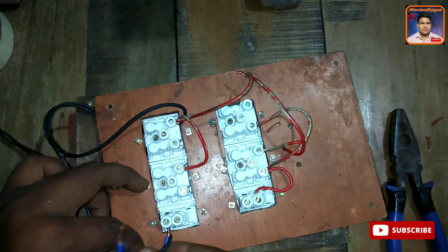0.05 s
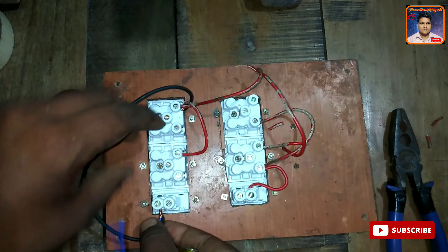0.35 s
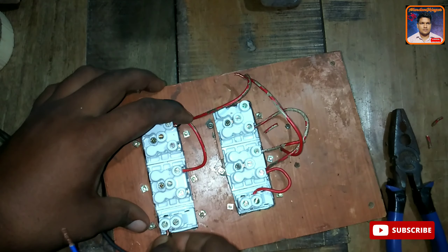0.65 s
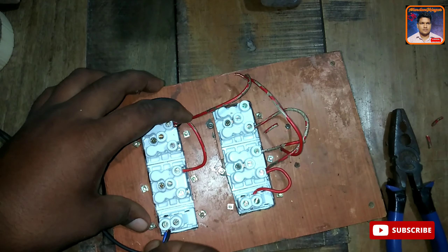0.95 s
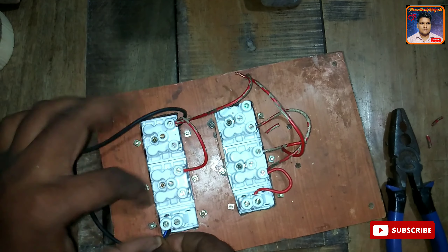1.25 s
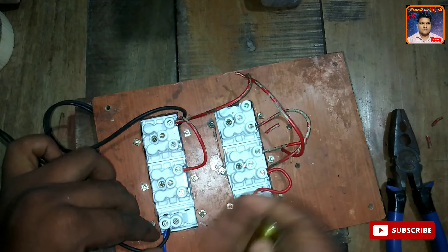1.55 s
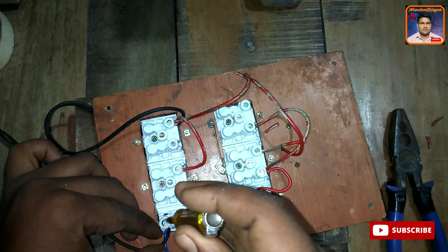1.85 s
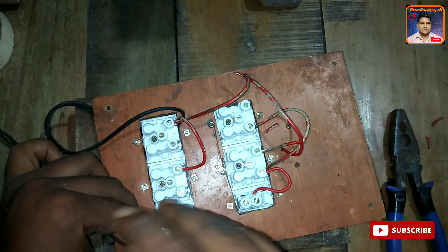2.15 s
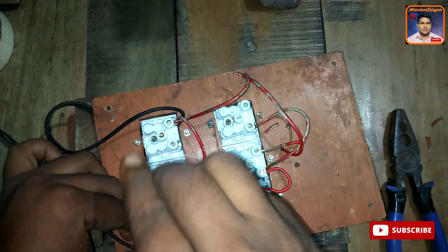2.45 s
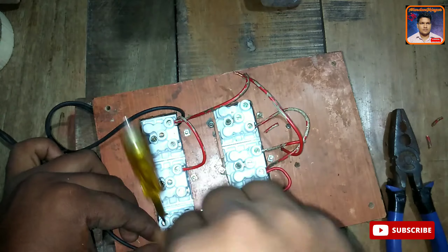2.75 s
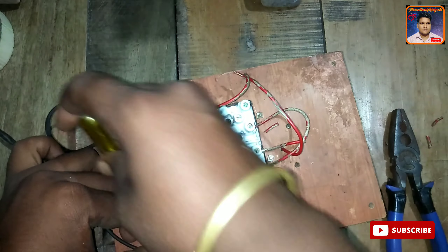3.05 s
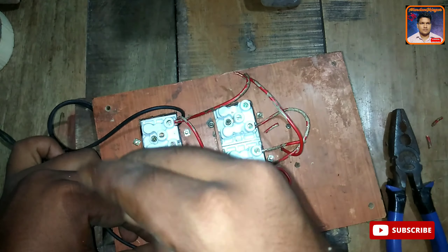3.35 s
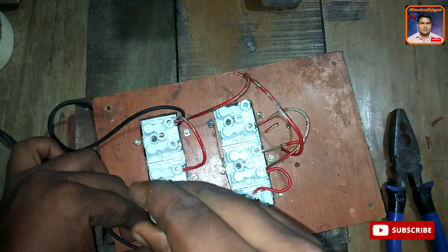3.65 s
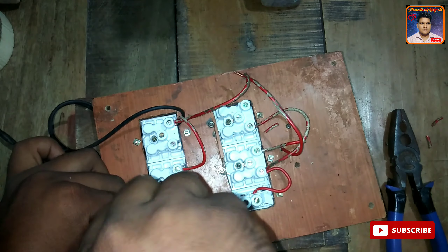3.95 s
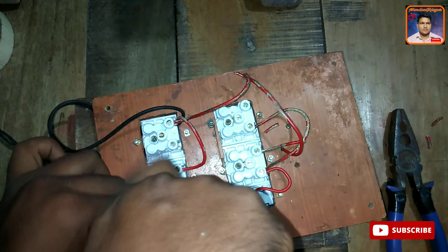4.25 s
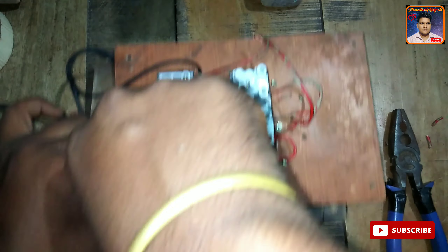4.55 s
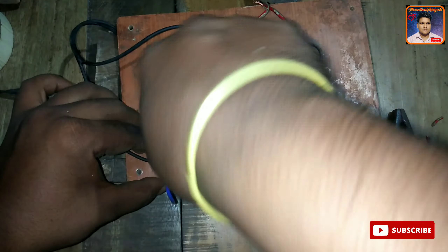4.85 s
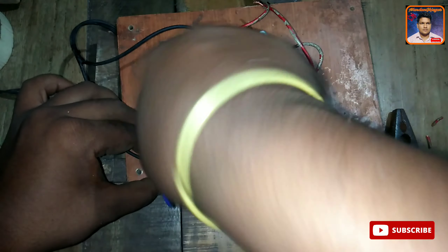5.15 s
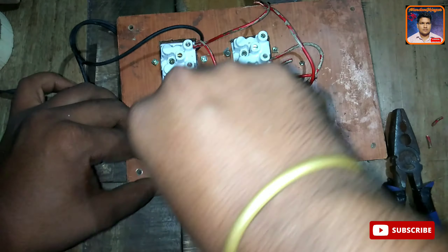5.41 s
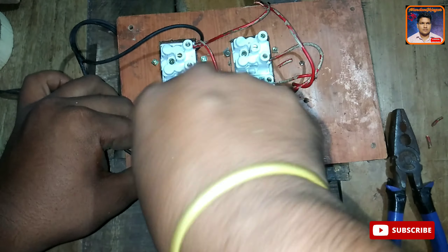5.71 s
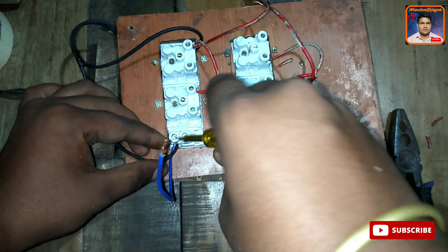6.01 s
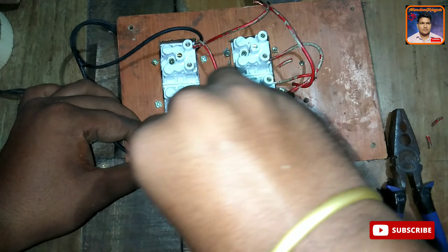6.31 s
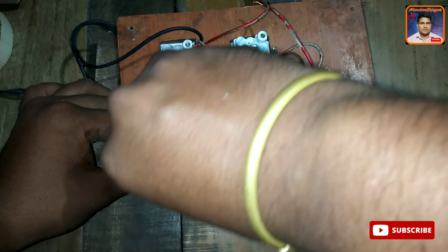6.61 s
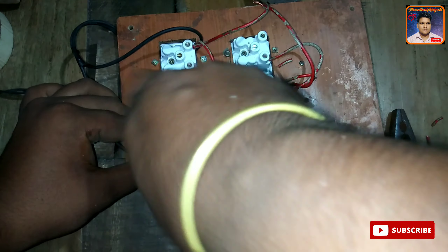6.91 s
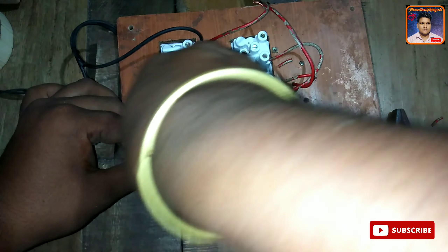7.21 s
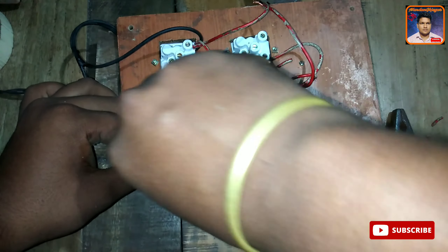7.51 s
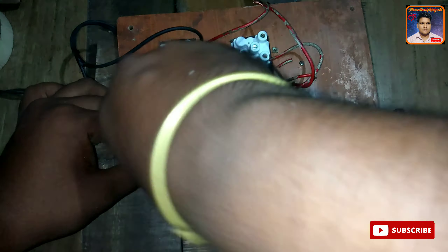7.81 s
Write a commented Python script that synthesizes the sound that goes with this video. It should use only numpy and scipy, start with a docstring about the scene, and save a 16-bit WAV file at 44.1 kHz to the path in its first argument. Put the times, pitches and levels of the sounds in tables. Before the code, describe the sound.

A loose board knocks and scrapes hollowly on a wooden table as a hand grabs it. Small, sharp clicks follow as a wire and a screwdriver tap the terminal of a plastic switch. Midway the board is shoved again with a short rumbling scrape, then the blade ticks and briefly grinds in a screw slot. Fingers rub and the wire rustles faintly throughout, heard close up in a small, quiet room.

```python
"""A wire is fitted to plastic switches on a loose board that lies on a wooden table in a small room.
First a hand grabs and shoves the board: impacts excite its resonances and stick-slip friction rumbles.
Then wire and screwdriver tap a terminal, and near 4.5 s the board is shoved again. From 5 s the blade
turns the screw, jumping and grinding in the slot; near 6.8 s the handle slips through the fingers.
Fingers rub and the wire rustles all along, and reverberation gives every contact a short tail."""
import sys
import numpy as np
from scipy import signal
from scipy.fft import rfft, irfft, next_fast_len
from scipy.io import wavfile
from scipy.ndimage import map_coordinates

SR = 44100
rng = np.random.default_rng(int(sys.argv[2]) if len(sys.argv) > 2 else 0)


def bounce(signal):
    """Save signal as a 16-bit WAV file at the path given by the first command-line argument."""
    frames = np.transpose(np.atleast_2d(signal))
    limited = np.clip(frames, -1, 1)
    pcm = np.round(limited * 32767).astype(np.int16)
    wavfile.write(sys.argv[1], SR, pcm)


N = 347067
TIME = np.arange(N) / SR
EDGE_HZ = 8870  # usual pitch of a contact's bright edge

# resonances of board and table: pitch_hz, width_hz, level_db
BOARD_MODES = [(167.4, 6.8, -5.5), (209.4, 6.2, -4), (251.2, 10, -1.5), (344, 30, -3.5), (407.4, 15, 7.5),
               (522, 20, -11), (560, 33, -4), (597.4, 30, -1.5), (753, 38, -7), (814, 43, -8.5),
               (944, 19, -6.5), (1065, 28, -3), (1144, 27, -6.5), (1730, 61, -10.5), (1960, 22, -12.5),
               (2052, 36, -8.5), (2856, 48, -4)]
# the board rocks on the table: start_s, level_db, weight_db, hardness_db
BOARD_KNOCKS = [(.0576, -57.5, 1.5, -7.5), (0.1816, -43, 8, -12), (.186, -42.5, 12, -5.5),
                (0.2115, -37.5, 9, -10.5), (0.249, -45, 15, -5), (0.2639, -34.5, -9, -14),
                (0.3405, -51.5, -21, -5.5), (.4246, -42, 5.5, -24.5), (.4629, -47, 8, -10),
                (0.5128, -39.5, 6.5, -9.5), (0.534, -19.5, 0, -20.5), (.546, -32.5, 6.5, -12.5),
                (.6202, -28.5, 5.5, -22), (0.6393, -32, -2, -10), (0.6798, -42.5, -1, 0.5),
                (0.7141, -41, -0.5, 0), (1.08, -60, -1.5, -8), (1.2567, -63, 6.5, -2),
                (2.7705, -47.5, -1, -9), (2.7999, -44.5, -1.5, -8), (2.8246, -42.5, -1, -10.5),
                (2.918, -42, -1.5, -10.5), (3.17, -60, 4.5, -21), (4.468, -50.5, 6.5, -20.5),
                (4.766, -51.5, 4, -16), (5.151, -55, -1.5, -15), (5.607, -45.5, 1, -28),
                (6.4563, -60.5, 4.5, -19), (6.7216, -52.5, 2.5, -16), (7.119, -50, -1, -14),
                (7.1683, -55.5, 0.5, -10), (7.6389, -54.5, -11, -17), (7.663, -55.5, -10, -17),
                (7.7756, -50, 0.5, -9), (7.8085, -47, -7, -11)]


def board_knocks():
    """Impact excitation: the board clacks at about the same pitch wherever it lands."""
    knocks = [(*row, scattered(964), scattered(EDGE_HZ)) for row in BOARD_KNOCKS]
    return contacts(knocks, BOARD_MODES, between_db=-15.5, room_db=3.5, clean_db=-2,
                    spot_db=3.5, ring_spot_db=1.5, ring_db=-3, detune=0, smear=0.69)


# thud, clack, ring and edge of a contact: low_hz, high_hz, snap_t60_s, tail_db, tail_t60_s
CONTACT_BANDS = [(154.6, 640, 0.027, -6.5, 0.17), (735, 2110, 0.02, -9.5, 0.15),
                 (2880, 5800, 0.015, -10.5, 0.15), (6570, 14700, 0.015, -10.5, 0.14)]


def contacts(blows, modes, between_db, room_db, clean_db, spot_db, ring_spot_db, ring_db, detune, smear):
    """Source and filter: a clean impulse, a rough snap and a diffuse tail pass through the struck body."""
    size = 12288
    t, hz = np.arange(size) / SR, np.fft.rfftfreq(size, 1 / SR)
    out = np.zeros(N + size)
    passbands = [causal(band(hz, low, high, order=6)) for low, high, *_ in CONTACT_BANDS]
    for start, level_db, weight_db, hardness_db, clack_hz, edge_hz in blows:
        # weight behind the blow feeds the thud; a hard contact feeds the ring and the edge
        levels = level_db + np.array([weight_db, 0, ring_db + 0.64 * hardness_db, hardness_db])
        # the grip shifts the resonances a little, and the struck spot favours three groups of them
        grip = 1 + detune * rng.standard_normal()
        spot = amp(spot_db * (near(hz, clack_hz, 0.18) + near(hz, edge_hz, 0.13))
                   + ring_spot_db * near(hz, 0.36 * edge_hz, 0.18))
        colour = causal(body(modes, hz * grip, between_db) * spot)
        # light contacts rub as much as they strike, so their snap lasts longer
        lightness = np.clip((-42 - max(levels)) / 12, 0, 1)
        for (_, _, snap_t60, tail_db, tail_t60), passband, db in zip(CONTACT_BANDS, passbands, levels):
            snap = amp(-60 * t / (snap_t60 * (1 + smear * lightness)))
            tail = amp(tail_db + room_db - 60 * t / tail_t60)
            force = rng.standard_normal(size) * np.hypot(snap, tail)
            force[0] += amp(clean_db) * (1 - lightness) * np.linalg.norm(snap)
            response = irfft(rfft(force) * colour * passband)
            onset_rms = response[:round(.015 * SR)].std()
            out[round(start * SR):][:size] += response * amp(db) / onset_rms
    return out[:N]


# spectrum of the board's sliding friction: frequency_hz, level_db
DRAG_SPECTRUM = [(59, -60), (100, -34.5), (202, 4), (406, -6.5), (471, -9), (583, -1), (691, -18.5),
                 (736, -6.5), (1360, -16), (1760, -6.5), (2470, -18), (2930, -14.5), (3470, -18.5),
                 (10200, -27), (16000, -42)]
# the board drags over the table: start_s, length_s, rumble_db, scrape_db
BOARD_SHOVES = [(0.182, 0.085, -36.5, -44), (2.298, 0.11, -67, -64), (2.701, 0.12, -57, -54.5),
                (4.461, 0.18, -34, -32.5)]


def board_shoves():
    """Stick-slip friction: the board catches and lets go; its weight rumbles, its edge scrapes."""
    slips = friction(slips_per_s=1100, smooth_db=1, uneven_db=.9)
    grind = filtered(slips, lambda hz: shape(DRAG_SPECTRUM, hz) * body(BOARD_MODES, hz, between_db=-8))
    rumble = unit(filtered(grind, lambda hz: band(hz, 1, 560)))
    scrape = unit(filtered(grind, lambda hz: band(hz, 760, SR)))
    out = np.zeros(N)
    for start, length, rumble_db, scrape_db in BOARD_SHOVES:
        # the board breaks loose, gathers speed and stops
        push = stroke(start, length, attack_s=.008, slope_db_per_s=71, release_db_per_s=184)
        out += push * (amp(rumble_db) * rumble + amp(scrape_db) * scrape)
    return out


# resonances of the switch and the free screwdriver: pitch_hz, width_hz, level_db
TERMINAL_MODES = [(342, 58, -1.5), (404.3, 18, 7), (1020, 160, -3), (1697, 130, -4.5), (1960, 100, -6),
                  (2920, 200, -2.5), (3200, 110, 1), (3930, 210, 1.5), (4813, 170, 3.5), (7740, 220, -7),
                  (9400, 430, -13.5), (13700, 340, -14)]
# taps on the terminal: start_s, level_db, weight_db, hardness_db, clack_hz, edge_hz
TERMINAL_TAPS = [(.6095, -55, 2, 15, 876, 6900), (.704, -56.5, 20.5, 11, 830, 8400),
                 (.7944, -38.5, -2, -3.5, 843, 7930), (.8217, -37.5, -5.5, -1.5, 1970, 8400),
                 (.9135, -66, 0.5, 9, 1270, 7900), (.945, -55.5, -9, -7, 1850, 9000),
                 (1.1758, -51.5, -2, -4.5, 2060, 8700), (1.1846, -49, -2, -1, 2080, 7040),
                 (1.8284, -45.5, -5.5, -1, 1170, 7120), (1.8757, -57, 2.5, 5.5, 1186, 11100),
                 (2.0037, -55, -4.5, 0, 1660, 7030), (2.0643, -54, 0.5, 2.5, 950, 9160),
                 (2.3, -67, 4.5, 5, 1610, 8500), (2.351, -68, 4, 6, 1830, 9380),
                 (2.9108, -47, -11.5, -7.5, 1140, 8340), (3.1309, -54, -3, -5.5, 1080, 7300),
                 (3.2201, -50, 0, -7.5, 1710, 10700), (3.3679, -45, -10, 11.5, 1100, 13840),
                 (3.3723, -48, 4, 5.5, 1140, 13800), (3.511, -47, -2.5, 0, 1000, 13000),
                 (3.6717, -52.5, 0, 3.5, 1040, 12650), (3.6984, -37.5, -5, -6.5, 1650, 9000),
                 (3.7682, -46.5, 2.5, 9, 1700, 10100), (3.7894, -41.5, -17, -14, 1850, 8400),
                 (4.2206, -62.5, 6.5, 14, 1020, 8200), (4.3015, -68.5, 5, 6.5, 1800, 8200)]


def terminal_taps():
    """Free vibration: switch and screwdriver ring briefly as wire and blade tap the terminal."""
    return contacts(TERMINAL_TAPS, TERMINAL_MODES, between_db=-9.5, room_db=1.5, clean_db=-5.5,
                    spot_db=5.5, ring_spot_db=4, ring_db=-0.5, detune=0.016, smear=0.15)


# resonances of the switch with the blade pressed into its screw: pitch_hz, width_hz, level_db
SCREW_MODES = [(402.3, 21, 5), (634, 12, -3.5), (987, 52, 0.5), (1490, 140, -7.5), (1634, 260, -2.5),
               (2060, 200, -3), (3230, 75, -1.5), (3800, 80, -6), (4790, 120, -5.5), (7020, 100, -3.5),
               (8000, 100, -10), (8820, 300, -8.5), (12900, 610, -9)]
# the turning blade jumps in the slot: start_s, level_db, weight_db, hardness_db, clack_hz
BLADE_JUMPS = [(4.9803, -52, 0.5, -16, 1640), (5.019, -63.5, 0, 0.5, 1070), (5.199, -51.5, 3, 9.5, 1720),
               (5.241, -58, 5, 12, 960), (5.3059, -42.5, -16, -13.5, 1650), (5.447, -47, -12, -10, 1480),
               (5.4802, -57.5, -1.5, 0.5, 1870), (5.672, -39, -10.5, -6.5, 910),
               (5.8156, -35.5, -11.5, -5.5, 1690), (5.8543, -47.5, 1.5, -1, 1740),
               (5.8908, -44.5, -1, 5.5, 1655), (6.1971, -58.5, 1, 3.5, 1620),
               (6.3085, -53, -2.5, -27, 1576), (6.3552, -39, -10, -4, 1675),
               (6.4875, -58.5, 5.5, -12, 1614), (6.6678, -53.5, -2, 1.5, 1765),
               (6.9969, -54, -8.5, -6, 1640), (7.2019, -53, 1, -19, 1610), (7.2388, -52.5, 1.5, 0, 1100),
               (7.2457, -53.5, -1, 0, 1007), (7.277, -46.5, 3, -18, 1550), (7.3054, -59, -5, 2.5, 1530),
               (7.3638, -41, -10, -3, 1410), (7.3749, -49, -10, -0.5, 1490), (7.4538, -61.5, -8, -8, 1630),
               (7.759, -68, -4, 11.5, 1800), (7.821, -48.5, -0.5, -12, 1170)]


def blade_jumps():
    """Coupled vibration: each jump in the slot rings blade and switch as one body."""
    jumps = [(*row, scattered(EDGE_HZ)) for row in BLADE_JUMPS]
    return contacts(jumps, SCREW_MODES, between_db=-13, room_db=2, clean_db=-1,
                    spot_db=7.5, ring_spot_db=-1.5, ring_db=-3, detune=0.013, smear=0.19)


# the blade grinds in the slot: start_s, length_s, level_db
SCREW_TURNS = [(5.195, 0.046, -66), (5.837, 0.062, -46.5)]


def blade_grind():
    """Forced vibration: steel slipping in the screw slot drives the resonances of the switch."""
    slips = friction(slips_per_s=500, smooth_db=2, uneven_db=1.5)
    grind = filtered(slips, lambda hz: body(SCREW_MODES, hz, between_db=-25) * band(hz, 880, 14000))
    turning = sum(amp(db) * stroke(start, length, attack_s=0.032, release_db_per_s=262)
                  for start, length, db in SCREW_TURNS)
    return unit(grind) * turning


# spectrum of skin sliding on the handle: frequency_hz, level_db
SKIN_SPECTRUM = [(71, -53), (120, -17), (226, 0), (295, -13), (410, 2), (454, -8), (742, -4), (892, -12),
                 (988, -2), (1580, -6), (3740, -9.5), (7500, -5.5), (16000, -15)]


def handle_slip():
    """Sliding friction: dense slips merge into a hiss as the handle slides to a new grip."""
    slips = friction(slips_per_s=6000, smooth_db=6, uneven_db=.5)
    hiss = filtered(slips, lambda hz: shape(SKIN_SPECTRUM, hz) * amp(2.3 * near(hz, 6300, .4)))
    sliding = stroke(start_s=6.818, length_s=0.059, attack_s=0.029, release_db_per_s=350)
    return amp(-37) * unit(hiss) * sliding


# spectra of rubbing skin and rustling wire: frequency_hz, level_db
RUB_SPECTRUM = [(40, -40), (110, -30.5), (170, 1), (400, -7.5), (700, -9), (1500, -13), (2200, -17),
                (3500, -19.5), (8000, -48)]
RUSTLE_SPECTRUM = [(500, -29), (1500, -1), (2800, -1), (5000, -1.5), (9000, -3.5), (15000, -7.5)]
# fingers hold and work the wire or handle: start_s, length_s, rub_db, rustle_db
FINGER_HOLDS = [(.02, 0.47, -59.5, -62.5), (0.572, 0.06, -45, -53), (0.766, 0.07, -52, -58.5),
                (1.06, 0.56, -60.5, -66), (1.975, .07, -64, -68), (2.898, 0.074, -56, -61.5),
                (3.141, .12, -58.5, -65.5), (3.508, .1, -70.5, -66), (3.734, .28, -59.5, -65.5),
                (4.215, 0.14, -63.5, -69.5), (4.608, 0.049, -40.5, -49.5), (4.969, 0.24, -62, -67.5),
                (5.178, .08, -52.5, -61), (5.47, 0.46, -56.5, -62), (6.18, 0.35, -60, -65.5),
                (6.677, 0.34, -57.5, -67), (7.176, 0.13, -56, -63), (7.414, .1, -64, -70),
                (7.583, .28, -55, -65)]


def fingers():
    """Friction noise follows pressure: skin rubs the board and the wire rustles with each hold."""
    skin = friction(slips_per_s=140, smooth_db=4.5, uneven_db=2)
    rub = filtered(skin, lambda hz: shape(RUB_SPECTRUM, hz) * body(BOARD_MODES, hz, between_db=-4.5))
    wire = friction(slips_per_s=340, smooth_db=11, uneven_db=3.5)
    rustle = filtered(wire, lambda hz: shape(RUSTLE_SPECTRUM, hz))
    rub_gain, rustle_gain = amp(-78.5), amp(-84)  # between holds the hands still lie on the work
    for start, length, rub_db, rustle_db in FINGER_HOLDS:
        # each hold tightens, slackens slowly and lets go
        hold = stroke(start, length, attack_s=0.026, slope_db_per_s=-3.5, release_db_per_s=108)
        rub_gain += amp(rub_db) * hold
        rustle_gain += amp(rustle_db) * hold
    return unit(rub) * rub_gain + unit(rustle) * rustle_gain


# course of one squeak: time_s, pitch_hz, level_db
SQUEAK_GLIDE = [(.138, 8150, -75), (.148, 8050, -51), (.16, 7700, -61), (.175, 7550, -62)]


def fingertip_squeak():
    """Nearly periodic stick-slip: a fingertip on the insulation gives a short falling tone."""
    times, pitch_hz, level_db = np.transpose(SQUEAK_GLIDE)
    wavering_hz = np.interp(TIME, times, pitch_hz) * (1 + .02 * wobble(900))
    phase = 2 * np.pi * np.cumsum(wavering_hz) / SR
    return np.sin(phase) * amp(np.interp(TIME, times, level_db, left=-np.inf, right=-np.inf))


def wire_ticks(ticks_per_s=5, weight_db=3, hardness_db=-5.5, clack_hz=1400):
    """Random impacts: the held wire ticks faintly against the terminal."""
    ticks = []
    for start, length, *_ in FINGER_HOLDS:
        for _ in range(round(ticks_per_s * length)):
            moment = start + length * rng.random()
            level_db = -69 + 0.5 * rng.standard_normal()
            ticks.append((moment, level_db, weight_db, hardness_db,
                          scattered(clack_hz), scattered(EDGE_HZ)))
    return contacts(ticks, TERMINAL_MODES, between_db=-5, room_db=5, clean_db=-6,
                    spot_db=3.5, ring_spot_db=4, ring_db=0, detune=0.032, smear=.3)


def table_shake(drive):
    """Structure-borne sound: the heavy table top trembles faintly under the board."""
    jolts = np.abs(drive) * rng.standard_normal(N)
    return amp(-2) * filtered(jolts, lambda hz: band(hz, 36, 75, order=2))


def room(x, t60_s):
    """Reverberation: diffuse reflections build up and decay exponentially, duller than the contacts."""
    t = np.arange(SR // 2) / SR
    build_up = 1 - np.exp(-t / 0.0073)
    tail = rng.standard_normal(len(t)) * amp(-60 * t / t60_s) * build_up
    reflections = signal.fftconvolve(x, tail / np.linalg.norm(tail))[:N]
    return filtered(reflections, lambda hz: band(hz, 100, 5000, order=1))


# spectrum of the still room: frequency_hz, level_db
AIR_SPECTRUM = [(15, -26), (25, 6.5), (33, -0.5), (70, -12.5), (190, -8), (503, -11), (575, -5.5),
                (677, -12), (1040, -11.5), (1260, -13.5), (1560, -15.5), (2550, -21.5), (3250, -17),
                (14800, -23.5), (16000, -36)]


def still_air():
    """Stationary noise: a faint, even rumble and hiss fills the room."""
    noise = rng.standard_normal(N)
    hush = filtered(noise, lambda hz: shape(AIR_SPECTRUM, hz) * band(hz, 50, SR, order=2))
    return amp(-71) * unit(hush)


def friction(slips_per_s, smooth_db, uneven_db):
    """Shot noise: tiny slips of random size over a smooth hiss, under uneven pressure."""
    slips = (rng.random(N) < slips_per_s / SR) * rng.standard_normal(N)
    hiss = amp(smooth_db) * rng.standard_normal(N)
    pressure = amp(uneven_db * wobble(45))
    return unit((unit(slips) + hiss) * pressure)


def stroke(start_s, length_s, attack_s, release_db_per_s, slope_db_per_s=0):
    """Envelope of a movement: it sets in, slopes up to or down from full level, and dies away."""
    age = TIME - start_s
    attack = np.clip(age / attack_s, 0, 1) ** 2
    held_db = slope_db_per_s * np.clip(age, 0, length_s) - max(slope_db_per_s * length_s, 0)
    return attack * amp(held_db - release_db_per_s * np.maximum(age - length_s, 0))


def scattered(pitch_hz):
    """Log-normal scatter: the pitch differs a little with the spot that is struck."""
    return pitch_hz * np.exp(0.076 * rng.standard_normal())


def wobble(knots_per_s):
    """Spline interpolation of random values gives a smooth, wandering curve."""
    knots = rng.standard_normal(int(N * knots_per_s / SR) + 4)
    return map_coordinates(knots, [TIME * knots_per_s])


def body(modes, hz, between_db):
    """Modal superposition: gain of resonances that add in power over an even response."""
    peaks = sum(amp(db) ** 2 / (1 + (2 * (hz - pitch) / width) ** 2) for pitch, width, db in modes)
    return np.sqrt(peaks + amp(between_db) ** 2)


def near(hz, pitch_hz, width):
    """Lorentzian peak: 1 at the pitch, falling away over a relative width."""
    return 1 / (1 + ((hz - pitch_hz) / (width * pitch_hz)) ** 2)


def band(hz, low, high, order=5):
    """Gain of a band-pass with smooth skirts."""
    return ((1 + (low / (hz + 1)) ** (2 * order)) * (1 + (hz / high) ** (2 * order))) ** -.5


def shape(points, hz):
    """Spectral envelope: gain through points joined on a log frequency axis."""
    frequency_hz, level_db = np.transpose(points)
    return amp(np.interp(np.log(hz + 1), np.log(frequency_hz), level_db))


def causal(gain):
    """Minimum phase: the response with this gain that rings only after the blow."""
    cepstrum = irfft(np.log(np.maximum(gain, 1e-6)))
    half = len(cepstrum) // 2
    cepstrum[1:half] *= 2
    cepstrum[half + 1:] = 0
    return np.exp(rfft(cepstrum))


def filtered(x, gain):
    """Zero-phase filtering: the spectrum of x times gain(hz)."""
    size = next_fast_len(N + SR // 4)
    return irfft(rfft(x, size) * gain(np.fft.rfftfreq(size, 1 / SR)), size)[:N]


def amp(db):
    """Decibels as an amplitude ratio."""
    return 10 ** (np.asarray(db) / 20)


def unit(x):
    """x scaled to an RMS of 1."""
    return x / np.sqrt(np.mean(x ** 2) + 1e-20)


def scene():
    """Superposition: board, terminal and screw sound in the room, over the fingers and still air."""
    knocks, shoves = board_knocks(), board_shoves()
    work = knocks + shoves + terminal_taps() + blade_jumps() + blade_grind() + handle_slip()
    rubbing = fingers() + fingertip_squeak()
    shaking = table_shake(amp(-2.5) * knocks + amp(1) * shoves + amp(-1.5) * rubbing)
    reverberation = amp(-25) * room(work, t60_s=0.38)
    return (work + rubbing + wire_ticks() + shaking + reverberation + still_air())[None]


def record(dry, ceiling=.39, top_hz=15450):
    """Soft saturation rounds off the loudest peaks, and a steep low-pass limits the treble."""
    rounded = dry[0] / (1 + (dry[0] / ceiling) ** 6) ** (1 / 6)
    return filtered(rounded, lambda hz: band(hz, 0.9, top_hz, order=70))[None]


dry = scene()
out = record(dry)
bounce(out)
```